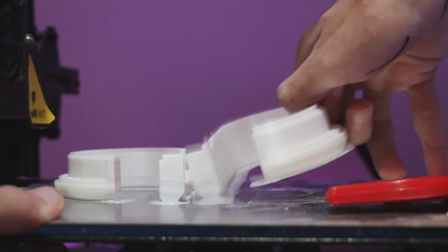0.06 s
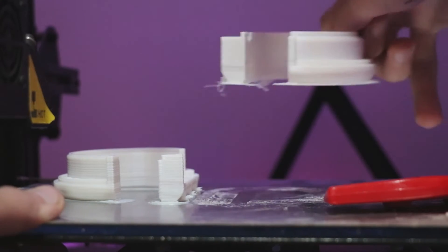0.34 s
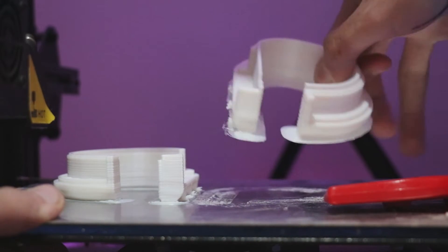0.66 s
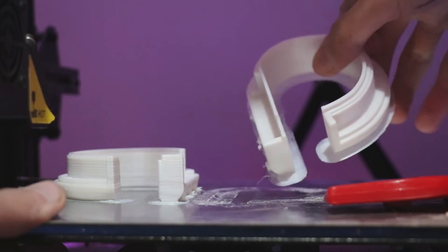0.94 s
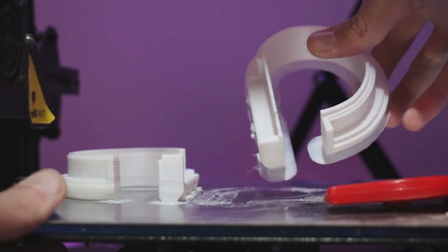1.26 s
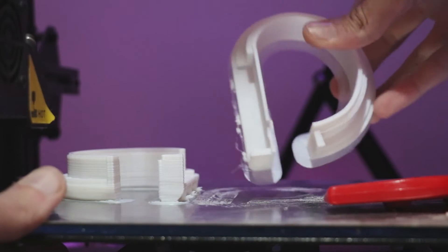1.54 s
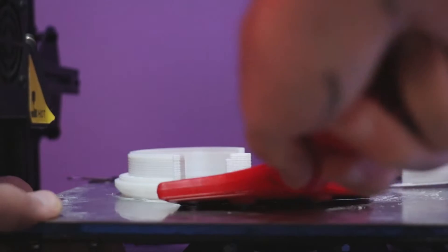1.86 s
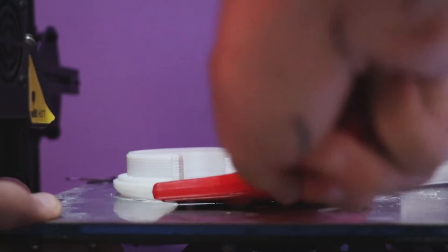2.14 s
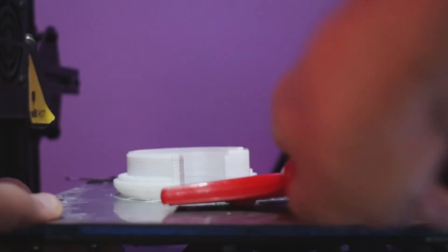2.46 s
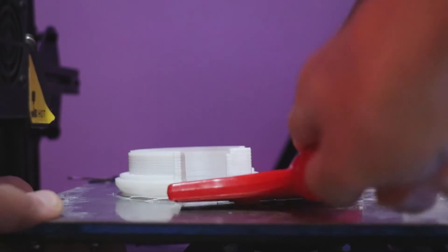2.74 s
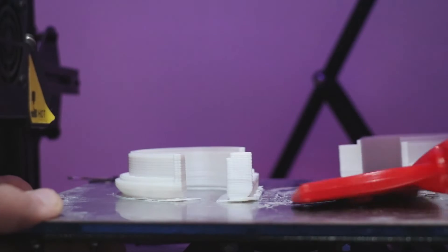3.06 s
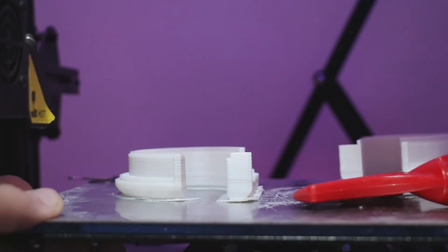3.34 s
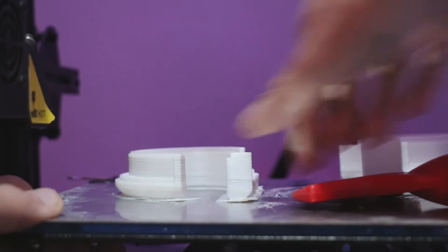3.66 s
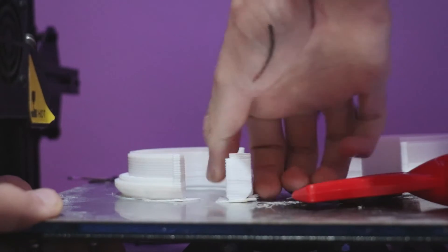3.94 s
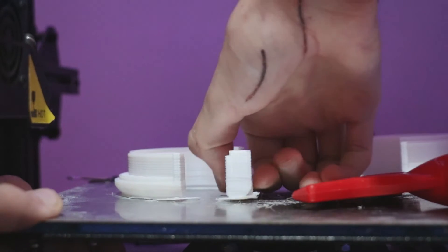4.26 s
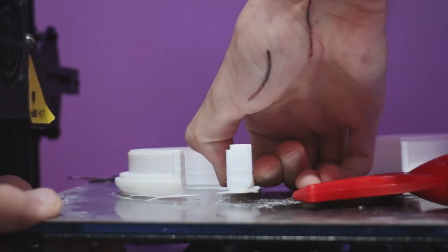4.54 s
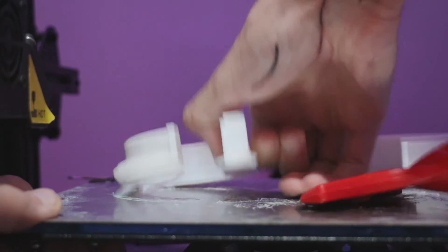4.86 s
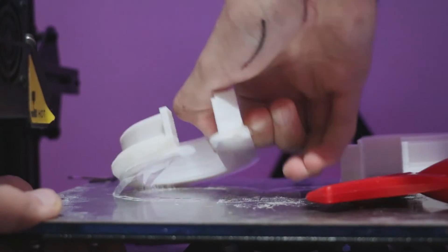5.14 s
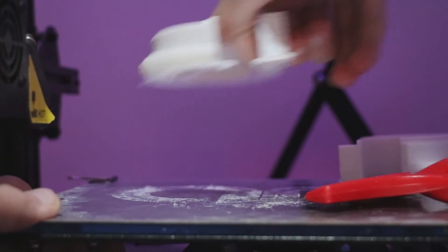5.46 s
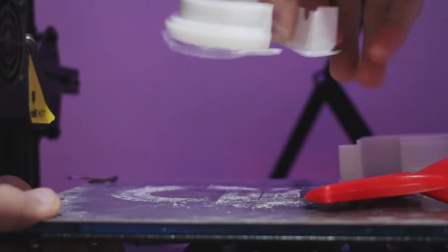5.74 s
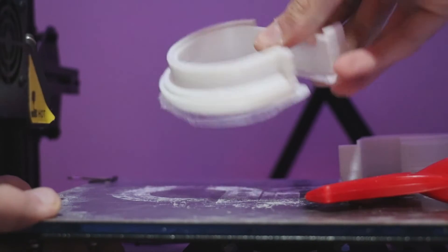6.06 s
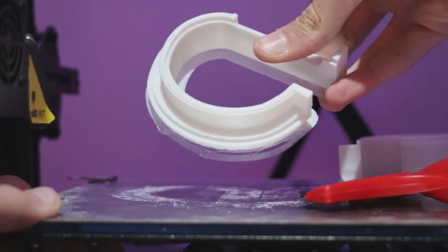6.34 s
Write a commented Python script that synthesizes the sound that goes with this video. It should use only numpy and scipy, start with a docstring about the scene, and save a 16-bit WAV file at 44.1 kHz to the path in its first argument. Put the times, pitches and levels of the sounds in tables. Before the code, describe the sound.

Plastic parts snap and crackle as they are prised off a printer bed, with light scraper knocks over a low hum.

```python
"""Over a low hum, a burst of snaps: printed plastic parts are prised off a printer bed in a small room.
Their stuck brims (thin rims) let go in snaps and tearing crackles that shake the plastic and the bed.
The bed thuds once on its springs. A scraper ticks under a brim and is laid down, tool and parts knock
on the bed, and one brim creaks as it peels. The sharpest snaps overload the microphone."""
import sys
import numpy as np
from scipy import signal
from scipy.fft import rfft, irfft
from scipy.io import wavfile
from scipy.ndimage import map_coordinates

SR = 44100
rng = np.random.default_rng(int(sys.argv[2]) if len(sys.argv) > 2 else 0)


def dump(signal):
    """Clip the signal to [-1, 1] and save it as 16-bit WAV at the path in sys.argv[1]."""
    limited = np.clip(np.atleast_2d(signal).T, -1, 1)
    pcm = np.round(limited * 32767).astype(np.int16)
    wavfile.write(sys.argv[1], SR, pcm)


N = 291060
LENGTH = 24576  # samples in one short sound
T, HZ = np.arange(LENGTH) / SR, np.fft.rfftfreq(LENGTH, 1 / SR)  # its times and frequencies

# The tones of the hum. Each row: pitch in Hz, level in dB, pitch drift in Hz.
HUM_TONES = [(49.65, -71.5, 2), (65.5, -62.5, 4), (104.1, -53, 5), (120.3, -59, 6.36), (203.2, -58.5, 8.2),
             (411, -73, 3.2)]
# The room's steady noise. Each row: frequency in Hz, relative level in dB.
AIR_COLOUR = [(20, -32), (33, -25), (60, -9.5), (88, -10), (112, -6), (160, -4.5), (215, -6.5), (265, -12),
              (370, -18), (570, -16.5), (1400, -26.5), (3000, -33.5), (8000, -41), (16000, -47)]
# How alike the room sounds left and right. Each row: frequency in Hz, likeness from 0 to 1.
LIKENESS = [(60, 0.86), (150, 1), (380, 0.8), (950, 0.36), (2380, 0.023), (5980, 0), (15000, 0.11)]
# The room's echo. Each row: frequency in Hz, seconds to fade by 60 dB.
ECHO_TIMES = [(200, 0.71), (1000, 0.34), (3000, 0.32), (7000, 0.34), (15000, 0.082)]
# A stuck brim cracks or ticks, or a loose part rings as it hits the bed. Each row: start in seconds,
# level in dB, pitch of the bending plastic in Hz, treble in dB, tearing time in seconds.
PLASTIC_SNAPS = [ (0.007, -32, 3260, 5, 0.0099), (0.031, -28, 2300, 3, 0.0013),
                 (0.042, -34, 3000, -2, .006), (0.0657, -28, 3450, 6, 0.0032),
                 (0.0729, -23.5, 3540, 7.5, 0.00046), (0.1096, -25.5, 3300, 6, 0.0057),
                 (0.129, -16, 2510, -4.5, .004), (0.24, -30, 2410, -1, 0.0072),
                 (1.401, -53.5, 3230, -19, 0.0056), (2.21, -42.5, 2840, -11.5, 0.0014),
                 (2.268, -40, 5670, -3, 0.00086), (2.4314, -44.5, 5000, -0.5, 0.0015),
                 (2.5074, -14.5, 5600, -11.5, 0.00023), (2.5103, -19.5, 2250, 1, 0.002),
                 (2.529, -21, 2300, -1, 0.0049), (2.536, -18.5, 6060, 4, 0.0068),
                 (2.5622, -25, 3850, 4, 0.0044), (2.622, -24.5, 3230, 6.5, .002),
                 (2.6335, -26, 6200, 2, 0.0039), (3.206, -49, 4370, 0, 0.0013), (3.875, -44, 7900, 2, .004),
                 (4.2335, -40, 8250, 2, 0.0011), (4.299, -45.5, 8000, 12.5, 0.0029),
                 (4.311, -30.5, 3350, 3.5, .0035), (4.547, -43.5, 3500, -2.5, 0.0013),
                 (4.551, -22.5, 3700, -1.5, 0.0027), (4.5713, -28.5, 3500, -0.5, 0.0038),
                 (4.575, -21.5, 3140, 3.5, 0.0017), (4.8718, -14, 2650, -8.5, 0.00031),
                 (4.8727, -16, 3900, -11.5, 0.0009), (4.9634, -25, 2940, 0.5, 0.0057),
                 (5.023, -26, 3670, -13, 0.00092), (5.143, -54.5, 8100, 22, 0.0015),
                 (5.182, -42, 7600, -3, .0027), (5.339, -21.5, 2440, 9, 0.0092)]
# How far the bending pitch stands out. Each row: pitch in Hz, boost in dB.
BENDING_BOOST = [(2250, -3), (2500, 6.5), (3000, -0.5), (3300, 7.5), (4400, 7.5), (5600, 2.5), (8200, 7)]
# A plain crack in plastic. Each row: frequency in Hz, relative level in dB.
CRACK_COLOUR = [(100, -18), (500, -5.5), (1200, 0.5), (2500, 1.5), (4200, 2), (5300, 1), (7000, 0),
                (10000, -0.5), (13000, -7.5), (16000, -14)]
# The notes a printed part rings with. Each row: pitch in Hz, width in Hz, strength in dB.
PART_NOTES = [(1374, 300, 1.5), (2030, 100, 2.5), (2340, 31, 4.5), (2602, 100, 2), (3096, 110, 4),
              (3376, 110, -0.5), (4040, 100, 1.5), (4610, 210, -0.5), (5800, 85, -3.5), (6635, 78, 2),
              (7175, 120, -4), (8300, 280, -1)]
# The parts face the left microphone. Each row: frequency in Hz, left minus right in dB.
LEFT_BOOST = [(500, 1), (2000, 1), (4000, 1.5), (8000, 4)]
# A plain, hard tap. Each row: frequency in Hz, relative level in dB.
TAP_COLOUR = [(150, -17), (350, -2.5), (900, -2.5), (1800, 1), (4000, 0), (6000, -10.5), (10000, -17),
              (16000, -33.5)]
# The notes the bed rings with. Each row: pitch in Hz, width in Hz, strength in dB.
BED_NOTES = [(372.2, 35, 9), (576, 23, 15), (748, 40, 15), (808, 88, 14), (968, 45, 14.5), (1300, 60, 0.5),
             (1540, 85, 4.5), (2356, 90, 2), (2740, 12, 10.5), (2960, 70, 9), (3670, 120, 6.5),
             (3930, 120, 1)]
# Slow peels and rubs. Each row: start in seconds, level in dB, tearing time in seconds.
SLOW_PEELS = [(0.163, -29.5, 0.024), (1.94, -59, 0.021), (2.585, -27.5, 0.063), (3.815, -52.5, 0.051),
              (4.782, -50.5, 0.094), (4.89, -21, 0.039), (5.229, -48.5, 0.036), (5.318, -51, 0.012),
              (5.778, -59, 0.084)]
# The rumble of the bed's frame. Each row: frequency in Hz, relative level in dB.
FRAME_COLOUR = [(40, -44), (80, 2), (130, -6.5), (200, -14), (280, -17.5), (700, -43.0)]
# Scraper and parts hit the bed. Each row: start in seconds, level in dB, hardness as treble in dB.
BED_KNOCKS = [(2.765, -45, -4.5), (2.863, -34, 7.5), (2.948, -36.5, 0.5), (3.036, -41, -11),
              (3.118, -45.5, -10.5), (3.295, -34.5, 2.5), (3.338, -38.5, -13), (4.960, -27, 4),
              (5.011, -25.5, 2), (5.024, -29, -4)]


def amp(db):
    """Turn decibels into a number to multiply by."""
    return 10 ** (np.asarray(db) / 20)


def unit(x):
    """Scale a sound to an average power of 1."""
    return x / np.sqrt(np.mean(x ** 2) + 1e-20)


def unit_energy(x):
    """Scale a sound to an energy of 1 per channel."""
    return unit(x) / np.sqrt(x.shape[-1])


def along(points, hz):
    """Read between the rows of a (frequency, value) table, spaced by octaves."""
    frequencies, values = np.transpose(points)
    return np.interp(np.log(hz + 1), np.log(frequencies + 1), values)


def fade(t, t60):
    """Die away by 60 dB in t60 seconds."""
    return np.exp(-np.log(1000) * t / t60)


def wobble(rate):
    """A smooth curve through `rate` random points a second."""
    points = rng.standard_normal(int(N * rate / SR) + 4)
    return map_coordinates(points, [np.arange(N) * rate / SR])


def coloured(x, db):
    """Turn each frequency in HZ up or down by its value in db."""
    cepstrum = irfft(np.log(amp(db) + 1e-6))
    cepstrum[1:LENGTH // 2] *= 2  # folded, so the filter rings after a hit and not before
    cepstrum[LENGTH // 2 + 1:] = 0
    return irfft(rfft(x) * np.exp(rfft(cepstrum)))


def add(track, start, db, sound):
    """Mix a sound in; db is its level as if all its energy came within 10 ms."""
    part = track[:, max(0, round(start * SR)):][:, :LENGTH]
    part += (amp(db) * np.sqrt(SR / 100) * sound)[:, :part.shape[1]]


def diffuse(hz, noise):
    """Sound from all around reaches two close microphones alike only in the bass."""
    turn = np.arccos(np.clip(along(LIKENESS, hz), -1, 1)) / 2
    mid, side = noise[0] * np.cos(turn), noise[1] * np.sin(turn)
    return np.array([mid + side, mid - side])


def hum(noise_db=-51):
    """A wavering low hum over the steady noise of the room."""
    t, hz = np.arange(N) / SR, np.fft.rfftfreq(N, 1 / SR)
    noise = diffuse(hz, rfft(rng.standard_normal((2, N))))
    air = irfft(noise * amp(along(AIR_COLOUR, hz)), N)
    tones = np.zeros(N)
    for pitch_hz, db, drift_hz in HUM_TONES:
        loudness = amp(db + 2.2 * wobble(rate=11))
        cycles = pitch_hz * t + np.cumsum(drift_hz * wobble(rate=12)) / SR
        tones += loudness * unit(np.sin(2 * np.pi * cycles))
    return amp(noise_db) * unit(air) + tones


def tearing(seconds, slips_per_s=2600, spread_db=4):
    """One sharp break, then a run of tiny slips that dies out."""
    happens = rng.random(LENGTH) < slips_per_s / SR
    direction = np.sign(rng.standard_normal(LENGTH))
    slips = happens * direction * amp(spread_db * rng.standard_normal(LENGTH))
    slips[0] = 2.3  # the first break
    return slips * np.exp(-(T / (1.75 * max(seconds, 1e-4))) ** 2)


def ringing(slips, t60, channels):
    """Each slip rings many close notes at once, which blur into fading noise."""
    power = np.abs(signal.fftconvolve(slips ** 2, fade(T, t60) ** 2)[:LENGTH])
    return unit_energy(rng.standard_normal((channels, LENGTH)) * np.sqrt(power))


def resonances(notes, detune, vary_db):
    """The boost in dB from an object's own notes, which shift with where it is held and touched."""
    hz, width, db = np.transpose(notes)[:, :, None]
    pitch = hz * (1 + detune * rng.standard_normal(hz.shape))
    power = amp(db + vary_db * rng.standard_normal(hz.shape)) ** 2
    peaks = power / (1 + (2 * (HZ - pitch) / width) ** 2)
    return 10 * np.log10(1 + peaks.sum(axis=0))


def room_echo(seconds, build_s=0.011):
    """The echo of a sound this long: it builds up, then dies fastest in the treble."""
    hz, t, noise = signal.stft(rng.standard_normal((2, LENGTH)), SR, nperseg=256)
    fading = diffuse(hz[:, None], noise) * fade(t, along(ECHO_TIMES, hz)[:, None])
    tail = signal.istft(fading, SR, nperseg=256)[1][:, :LENGTH]
    return unit_energy(tail * (1 - np.exp(-T / (build_s + seconds))))


def snap(pitch_hz, tone_db, treble_db, tear_s, crack_db=-3, echo_db=-11, bass_db=-9):
    """A break or hit shakes the freed plastic, which gives off little below its bending pitch."""
    octaves = np.log2((HZ + 1) / pitch_hz)
    peak = np.exp(-(octaves / .25) ** 2)
    dip_below = .35 * (1 - np.tanh((octaves + .3) / .12))
    tone = tone_db * (peak - dip_below)
    tilt = bass_db * np.clip(-octaves / 1.6, 0, 1) + treble_db * np.clip(octaves / 2, 0, 1.33)
    colour = along(CRACK_COLOUR, HZ) + tilt + resonances(PART_NOTES, detune=0.007, vary_db=3)
    slips = tearing(tear_s)
    clean = 1 + 0.69 * np.exp(-tear_s / 0.0005)  # a clean break puts more into its first crack
    crack = clean * amp(crack_db) * ringing(slips, t60=0.0036, channels=1)
    ring = ringing(slips, t60=0.077, channels=2)
    near = coloured(crack + ring, colour + tone)
    echo = coloured(room_echo(tear_s), colour + 0.77 * tone)  # the tone is strongest straight ahead
    return unit_energy(near) + amp(echo_db) * unit_energy(echo)


def snaps():
    """Stuck brims crack or tick, or a loose part rings as it hits the bed."""
    out = np.zeros((2, N))
    for start, db, pitch_hz, treble_db, tear_s in PLASTIC_SNAPS:
        add(out, start, db, snap(pitch_hz, along(BENDING_BOOST, pitch_hz), treble_db, tear_s))
    return out


def from_the_left(x, lead_s=.000012):
    """Sound from the parts reaches the left microphone louder and a little earlier."""
    hz, sides = np.fft.rfftfreq(2 * N, 1 / SR), np.array([[.5], [-.5]])
    gain = amp(along(LEFT_BOOST, hz) * sides)
    time_shift = np.exp(2j * np.pi * hz * lead_s * sides)
    return irfft(rfft(x, 2 * N) * gain * time_shift)[:, :N]


def knock(hard_db, chatter_s, click_db=-1, echo_db=-9, hollow_hz=780):
    """A chattering tap rings the bed: a hard one sounds bright, a soft one hollow."""
    treble = HZ ** 2 / (HZ ** 2 + 1700 ** 2)
    hollow = 0.44 * np.exp(-(np.log2((HZ + 1) / hollow_hz) / .35) ** 2)
    colour = along(TAP_COLOUR, HZ) + resonances(BED_NOTES, detune=0.0086, vary_db=0.5)
    colour += hard_db * (treble - hollow)
    slips = tearing(chatter_s)
    click = amp(click_db) * ringing(slips, t60=.011, channels=1)
    ring = ringing(slips, t60=0.072, channels=2)
    near = coloured(click + ring, colour)
    echo = coloured(room_echo(chatter_s), colour)
    return unit_energy(near) + amp(echo_db) * unit_energy(echo)


def recoil(db_per_octave=29):
    """Every snap kicks the bed; a longer, lower-pitched strip kicks harder."""
    out = np.zeros((2, N))
    for start, db, pitch_hz, _, tear_s in PLASTIC_SNAPS:
        kick_db = -16 - db_per_octave * np.log2(pitch_hz / 2502)
        add(out, start, db + kick_db, knock(hard_db=3.5, chatter_s=0.52 * tear_s))
    return out


def peels():
    """A brim peels or something rubs slowly: a snap drawn out into a fine crackle."""
    out = np.zeros((2, N))
    for start, db, tear_s in SLOW_PEELS:
        add(out, start, db, snap(pitch_hz=2654, tone_db=0, treble_db=2, tear_s=tear_s))
    return out


def thud(start=0.24, db=-28, pitch_hz=106, rise_s=0.0094):
    """The bed springs back when the first part comes free, and its frame rumbles on."""
    out = np.zeros((2, N))
    bounce = np.sin(2 * np.pi * pitch_hz * T) * fade(T, t60=0.091) * (1 - np.exp(-T / rise_s))
    noise = rng.standard_normal(LENGTH) * fade(T, t60=0.38)
    frame = coloured(noise, along(FRAME_COLOUR, HZ))
    add(out, start, db, np.array([unit_energy(bounce) + 0.83 * unit_energy(frame)] * 2))
    return out


def knocks(reference_db=-30.5, halving_db=11):
    """Scraper and parts knock on the bed; light, soft taps chatter longer."""
    out = np.zeros((2, N))
    for start, db, hard_db in BED_KNOCKS:
        firm_db = db - reference_db + max(hard_db, 0)
        add(out, start, db, knock(hard_db, chatter_s=0.0063 * 2 ** (-firm_db / halving_db)))
    return out


def creak(start=4.885, db=-37, start_hz=1330, fall_hz_per_s=5500, lowest_hz=950, width_hz=70):
    """As the second brim peels, the freed strip gets longer and its ring falls in pitch."""
    out = np.zeros((2, N))
    pitch = np.maximum(start_hz - fall_hz_per_s * T, lowest_hz)
    slow_noise = irfft(rfft(rng.standard_normal(LENGTH)) * np.exp(-(HZ / width_hz) ** 2))
    rough_tone = np.real(signal.hilbert(slow_noise) * np.exp(2j * np.pi * np.cumsum(pitch) / SR))
    ring = rough_tone * fade(T, t60=0.26) * (1 - np.exp(-T / .003))
    add(out, start, db, np.array([unit_energy(ring)] * 2))
    return out


def scene(bed_left_db=2.5):
    """Everything heard beside the printer bed."""
    bed = (knocks() + recoil()) * amp([[bed_left_db / 2], [-bed_left_db / 2]])
    return from_the_left(snaps() + peels()) + bed + thud() + hum() + creak()


def record(dry, top_hz=16000):
    """The microphone clips the loudest peaks, and the highest treble is cut off."""
    hz = np.fft.rfftfreq(N, 1 / SR)
    return irfft(rfft(np.clip(dry, -1, 1)) / (1 + (hz / top_hz) ** 120), N)


dry = scene()
out = record(dry)
dump(out)
```